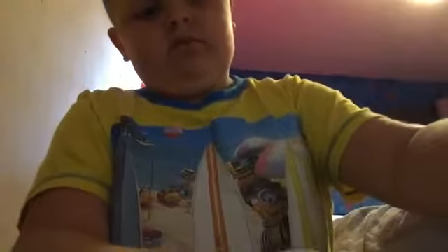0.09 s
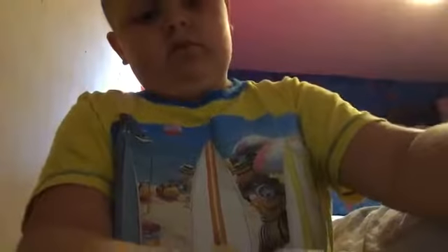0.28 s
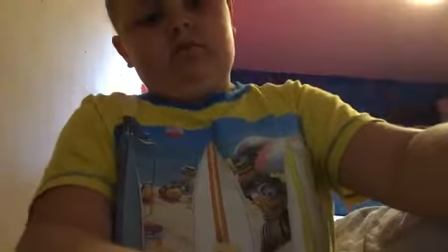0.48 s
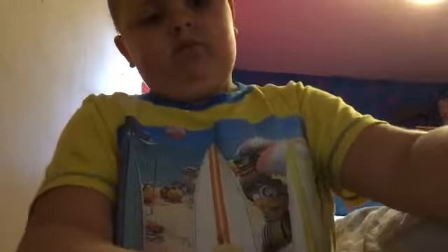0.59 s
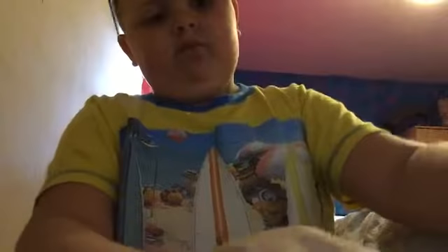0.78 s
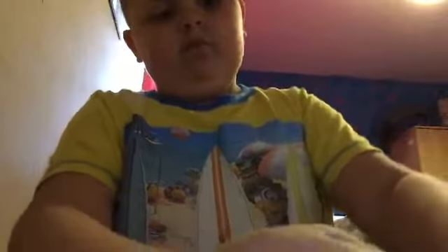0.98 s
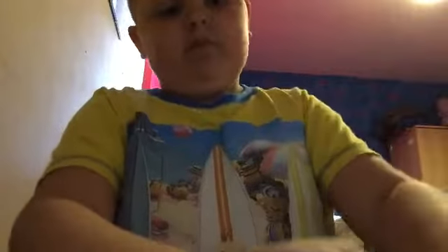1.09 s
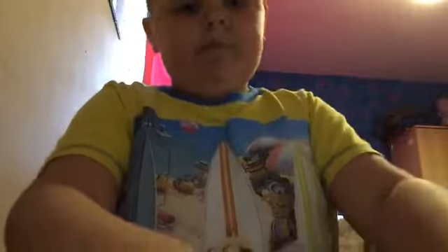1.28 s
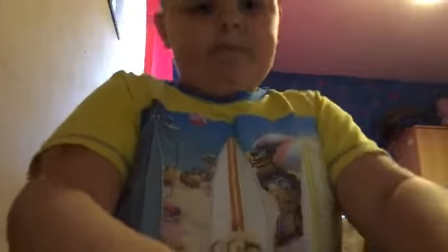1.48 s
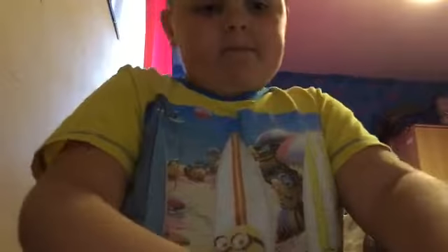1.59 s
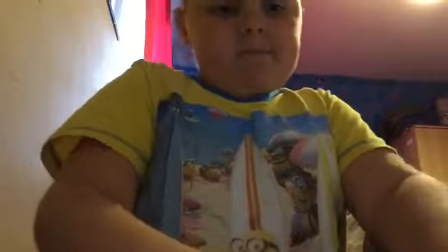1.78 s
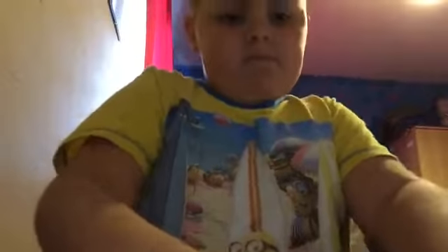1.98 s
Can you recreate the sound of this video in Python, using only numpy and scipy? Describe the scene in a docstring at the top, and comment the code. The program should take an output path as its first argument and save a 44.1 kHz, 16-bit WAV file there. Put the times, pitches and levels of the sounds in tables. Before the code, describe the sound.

Close paper crackling and rustling in uneven bursts as hands handle it, with dull knocks.

```python
"""In a bedroom, hands crumple, flex and pull a sheet of paper close to a small microphone.
Creases snap and fibres crackle in a dense rustle. Reflections from a table colour the paper's sound
with broad peaks, which shift as the sheet moves closer. Hands and sheet strike the table in soft,
damped thuds, over a low rumble of handling and the short reverberation of the room."""
import sys
import numpy as np
from scipy import signal
from scipy.fft import rfft, irfft
from scipy.io import wavfile

SR = 44100
rng = np.random.default_rng(int(sys.argv[2]) if len(sys.argv) > 2 else 0)


def log_audio(samples):
    """Write samples as a 16-bit WAV file to the path given in sys.argv[1]."""
    # one column per channel
    frames = np.atleast_2d(samples).T
    # limit to full scale, then quantise
    limited = np.clip(frames, -1, 1)
    pcm = np.round(limited * 32767).astype(np.int16)
    wavfile.write(sys.argv[1], SR, pcm)


N = 88200

# crease snaps: (time [s], low, middle, high and treble drive [dB], decay [ms], rise [ms])
CREASE_SNAPS = [(0.1009, -51, -42, -52.5, -53, 2.5, 1.5), (0.11, -29, -40.5, -64, -56, 4, 0.6),
                (0.173, -53, -42, -61, -75.9, 0.69, 0.77), (0.1815, -40.5, -44, -61, -69.9, 0.96, 0.92),
                (0.191, -60, -36, -51, -43.5, 1.4, 0.31), (0.2215, -20, -17.5, -23.5, -20.5, 2.7, 1),
                (0.2259, -25, -10.5, -30, -21, 1.3, 0.68), (0.2313, -21, -16.5, -22.5, -17.5, 2.5, 0.18),
                (0.2358, -30, -25, -31, -24, 0.54, 0.31), (0.2388, -31, -22, -33, -21, 0.44, 0.6),
                (0.2425, -33, -14, -26, -24.5, 1.8, 0.9), (0.2608, -55, -22, -31, -44, 2.5, 0.88),
                (0.2675, -33, -23, -22, -32.5, 2, 1.2), (0.272, -30, -17, -37, -44, 0.99, 0.8),
                (0.2765, -35.5, -31, -31, -45, 3, 1.4), (0.2834, -32, -21, -29, -23, 2.7, 0.36),
                (0.2898, -23.5, -22, -31, -30, 2.2, 0.64), (0.2992, -28.5, -27.5, -25.5, -49, 1.9, 0.51),
                (0.365, -38, -39, -49, -64, 2, 1.0), (0.3743, -24.5, -26, -44, -51, 1.26, 0.81),
                (0.4593, -44.5, -48.5, -65, -60, 1.5, 0.33), (0.4809, -49.5, -46, -57, -52.5, 2.8, 0.78),
                (0.4979, -57, -37.5, -47, -58, 1.3, 0.6), (0.5098, -57, -36, -40.5, -49, 1.4, 1.0),
                (0.543, -48.5, -45, -51, -66.4, 3.1, 0.55), (0.5887, -39.5, -36.5, -41, -50.5, 1.8, 0.82),
                (0.604, -45, -35.5, -47, -53, 1.1, 0.58), (0.784, -45, -38, -36, -55, 1.8, 2.1),
                (0.801, -36, -28.5, -30, -38.5, 1.5, 1.25), (0.8145, -55, -42, -36.5, -51, 2.8, 0.74),
                (0.826, -57, -61, -38, -51, 1.6, 0.85), (1.056, -36.5, -64, -74, -75, 2.8, 2.05),
                (1.142, -26.5, -35, -46.5, -54, 3.7, 0.5), (1.3864, -46.5, -63, -41, -65, 0.28, 0.48),
                (1.4254, -38, -56, -56, -72, 1.7, 0.36), (1.4638, -30, -46, -63, -55, 2.5, 0.49),
                (1.474, -33, -28, -38.5, -33, 0.7, 0.93), (1.491, -26.5, -31, -52, -44, 2.14, 0.25),
                (1.525, -34.5, -41, -47, -50, 4.1, 1.6), (1.571, -36, -40, -53, -55, 3.3, 0.44),
                (1.5943, -28, -34, -35, -42, 1.1, 0.56), (1.627, -23.5, -27, -23.5, -32, 0.44, 0.12),
                (1.849, -57, -56, -50, -38, 0.99, 0.64), (1.87, -46, -44, -45, -47, 2.5, 0.31),
                (1.881, -31.5, -50, -39, -37.5, 1.4, 1.3), (1.9079, -34, -43, -36, -46, 1, 1.2),
                (1.921, -45, -36.5, -42, -47, 4.1, 1.6), (1.9395, -36, -45, -50, -42.5, 3.7, 0.66),
                (1.9629, -34, -44, -40, -40, 1.1, 0.44)]
# rustle envelopes: (time [s], low, middle, high and treble drive [dB])
RUSTLE_LEVELS = [(0, -56, -55.5, -58, -82), (0.085, -59.5, -63, -82, -83), (0.105, -82, -56, -60, -64),
                 (0.14, -80, -56.5, -65, -76), (0.188, -84, -59, -58.2, -65), (0.215, -66, -46, -41.5, -51),
                 (0.255, -52, -55, -30.5, -29.5), (0.31, -48.5, -52, -38, -41.5),
                 (0.335, -91, -58, -67, -58), (0.36, -42, -40.5, -41, -50), (0.42, -55, -52, -49.5, -58),
                 (0.445, -70, -60.5, -74, -78), (0.5, -55.5, -52.5, -47.5, -61),
                 (0.565, -66.5, -59, -61.5, -76), (0.6, -69, -51, -47.5, -57), (0.65, -53, -56.5, -67, -85),
                 (0.72, -54, -51.5, -51, -64), (0.78, -57.5, -48, -46, -50), (0.85, -51, -42.5, -41.5, -52),
                 (0.875, -55, -64, -63, -70.5), (0.96, -58.5, -60, -61, -70.5),
                 (1.0, -59.5, -57, -54.5, -61.5), (1.1, -58, -56, -54.5, -58.5),
                 (1.13, -48.5, -44, -41, -44.5), (1.2, -53.5, -52, -48.5, -53),
                 (1.24, -63, -59, -54, -58.5), (1.27, -58.5, -59.5, -67, -78),
                 (1.41, -62, -62.5, -67.5, -89), (1.46, -53, -54, -50, -57), (1.55, -48, -43.5, -41.5, -46),
                 (1.58, -37.5, -35, -36, -44), (1.62, -41.5, -35.5, -33.5, -40.5),
                 (1.66, -48.5, -40, -43, -49.5), (1.85, -41, -42, -38.5, -43),
                 (1.93, -40.5, -41.5, -37, -42.5), (1.96, -55.5, -47, -44, -48.5),
                 (2.0, -44, -47, -46, -51)]
# broad peaks from table reflections, sheet far and near: (frequency [Hz], width [Hz], lift [dB])
FAR_PEAKS = [(1610, 1100, 14.5), (2944, 690, 12), (4080, 310, 7.5), (5300, 1200, 10.5), (6170, 560, 5)]
NEAR_PEAKS = [(1663, 830, 14), (2890, 720, 13.5), (3974, 1050, 16), (5380, 1060, 8.5), (6600, 1050, 10),
              (14270, 3700, 6)]
# spectral slopes beneath those peaks: (frequency [Hz], relative level [dB])
FAR_SLOPE = [(500, 13), (900, 1), (2200, -11.5), (7000, -5.5), (9000, -11), (11000, -20), (16000, -21)]
NEAR_SLOPE = [(500, 4), (900, -8), (2300, -15.5), (8000, -6), (10000, -17.5), (14300, -22.5),
              (16000, -21.5)]
# impacts on the table: (time [s], level [dB], starting pitch [Hz], 60 dB decay time [s])
TABLE_THUDS = [(0.114, -34.5, 415, 0.044), (0.202, -38, 325, 0.032), (0.225, -17.5, 283, 0.031),
               (0.242, -22, 495, 0.053), (0.264, -20.5, 460, 0.03), (0.284, -23, 325, 0.069),
               (0.371, -35.5, 298, 0.069), (0.582, -32, 310, 0.026), (0.676, -40, 600, 0.05),
               (0.812, -37, 240, 0.091), (0.867, -35, 237, 0.035), (1.02, -36, 264, 0.085),
               (1.052, -41, 389, 0.12), (1.061, -19, 298, 0.03), (1.143, -21, 289, 0.029),
               (1.163, -29.5, 586, 0.03), (1.299, -33, 276, 0.071), (1.396, -24, 289, 0.046),
               (1.463, -15.5, 276.3, 0.044), (1.544, -31, 260, 0.046), (1.649, -11.5, 454, 0.018),
               (1.654, -12, 219, 0.027), (1.677, -17, 312, 0.041)]
# envelope of the handling rumble: (time [s], level [dB])
RUMBLE_LEVELS = [(0, -54), (.08, -53.5), (.25, -39), (.43, -57), (.75, -57.5), (.88, -48), (.96, -60),
                 (1.08, -50.5), (1.27, -56.5), (1.43, -48.5), (1.55, -36.5), (1.75, -51.5), (2, -47)]
# spectrum of the handling rumble: (frequency [Hz], relative level [dB])
RUMBLE_SPECTRUM = [(25, -21), (70, -23.5), (130, 2), (205, -0.5), (370, -5.5), (600, -15.5), (1500, -52)]

BAND_EDGES_HZ = (550, 2200, 4500, 8000, 30000)
SNAP_GRAIN_DB, SNAP_LOW_HZ = 4.5, 880
FIBRES_PER_S, FIBRE_SPREAD_DB, HISS_DB, CLUMP_DB = 900, 2.5, 4, 1.5
APPROACH_START_S, APPROACH_END_S = 0.838, 0.9
THUD_RISE_S, THUD_SAG, TABLE_LOW_HZ = 0.0012, 0.082, 106
RUMBLE_LUMP_DB = 3
ROOM_DB, ROOM_T60_S, ROOM_HZ = -12.5, 0.1, 5400
MIC_LOW_HZ, MIC_HIGH_HZ = 79, 15760


def crease_snaps():
    """Buckling: each crease builds up, breaks in a spray of small cracks and dies out, in four bands."""
    lead = 600  # samples ahead of the break
    t_ms = np.arange(-lead, 1400) / SR * 1000
    # the low band rises and decays more slowly
    rise_stretch, decay_stretch = np.c_[[2.2, 1, 1, 1]], np.c_[[1.08, 1, 1, 1]]
    drives = np.zeros((4, N + len(t_ms)))
    for time_s, *bands_db, decay_ms, rise_ms in CREASE_SNAPS:
        rise, decay = rise_ms * rise_stretch, max(decay_ms, .3) * decay_stretch
        envelope = 2 / (np.exp(-t_ms / rise) + np.exp(t_ms / decay))
        noise, grain = rng.standard_normal((2, 4, len(t_ms)))
        spray = noise * gain_of(SNAP_GRAIN_DB * grain) * envelope
        spray *= (np.linalg.norm(envelope, axis=1) / np.linalg.norm(spray, axis=1))[:, None]
        at = round(time_s * SR)
        drives[:, at:at + len(t_ms)] += gain_of(bands_db)[:, None] * spray
    # a crease is too small to radiate low frequencies
    return signal.lfilter(*signal.butter(1, SNAP_LOW_HZ, "high", fs=SR), drives[:, lead:N + lead])


def fibre_rustle():
    """Friction: fibres crack in clumps over the hiss of paper sliding on paper and skin, in four bands."""
    size_db = FIBRE_SPREAD_DB * np.minimum(rng.exponential(1, N), 5)
    impulses = gain_of(size_db) * rng.choice([-1, 1], N)
    cracks = unit_rms(impulses * (rng.random(N) < FIBRES_PER_S / SR))
    hiss = gain_of(HISS_DB) * rng.standard_normal(N)
    drive = unit_rms((cracks + hiss) * gain_of(CLUMP_DB * wander(cutoff_hz=77)))
    return np.array([drive * gain_curve(RUSTLE_LEVELS, column) for column in (1, 2, 3, 4)])


def paper_colour(drives):
    """Interference: broad peaks stand for table reflections and shift as the sheet moves closer."""
    hz = np.fft.rfftfreq(4096, 1 / SR) + 1
    near = np.interp(np.arange(N) / SR, [APPROACH_START_S, APPROACH_END_S], [0, 1])
    out = np.zeros(N)
    for share, peaks, slope in (1 - near, FAR_PEAKS, FAR_SLOPE), (near, NEAR_PEAKS, NEAR_SLOPE):
        lift_db = sum(db / (1 + ((hz - centre) / (width / 2)) ** 2) for centre, width, db in peaks)
        for drive, low, high in zip(drives, BAND_EDGES_HZ, BAND_EDGES_HZ[1:]):
            band_db = -10 * np.log10((1 + (low / hz) ** 10) * (1 + (hz / high) ** 10))
            response = minimum_phase(spectrum_db(slope, hz) + lift_db + band_db)
            out += signal.oaconvolve(drive * np.sqrt(share), response / np.linalg.norm(response))[:N]
    return out


def table_thuds():
    """Damped oscillation: each knock on the table is a low tone whose pitch sags as it dies."""
    t = np.arange(6000) / SR
    attack = 1 - np.exp(-(t / THUD_RISE_S) ** 2)
    out = np.zeros(N + len(t))
    for time_s, db, hz, t60 in TABLE_THUDS:
        phase = 2 * np.pi * hz * t * (1 - THUD_SAG * t / (t + t60))
        at = round(time_s * SR)
        out[at:at + len(t)] += gain_of(db - 60 * t / t60) * attack * np.sin(phase)
    # the table top radiates little deep bass
    return signal.sosfilt(signal.butter(4, TABLE_LOW_HZ, "high", fs=SR, output="sos"), out[:N])


def handling_rumble():
    """Friction noise: hands and sleeves moving on the table make a low, lumpy rumble."""
    tone = gain_of(spectrum_db(RUMBLE_SPECTRUM, np.fft.rfftfreq(N, 1 / SR)))
    lumpy_noise = rng.standard_normal(N) * gain_of(RUMBLE_LUMP_DB * wander(cutoff_hz=18))
    rumble = irfft(rfft(lumpy_noise) * tone, N)
    return unit_rms(rumble) * gain_curve(RUMBLE_LEVELS, column=1)


def room_tail(direct):
    """Reverberation: sparse, dulled reflections decay exponentially in the bedroom."""
    taps = np.zeros(SR // 2)
    slots = np.arange(100, len(taps) - 20, 20)
    taps[slots + rng.integers(0, 20, len(slots))] = rng.choice([-1., 1.], len(slots))
    taps = signal.lfilter(*signal.butter(1, ROOM_HZ, fs=SR), taps)
    taps *= gain_of(-60 * np.arange(len(taps)) / SR / ROOM_T60_S)
    return signal.oaconvolve(direct, taps / np.linalg.norm(taps))[:N]


def gain_of(db):
    return 10 ** (np.asarray(db) / 20)


def unit_rms(x):
    return x / np.sqrt(np.mean(x ** 2) + 1e-20)


def gain_curve(table, column):
    """Interpolation in time: a column of levels becomes a gain at every sample."""
    rows = np.array(table)
    return gain_of(np.interp(np.arange(N) / SR, rows[:, 0], rows[:, column]))


def spectrum_db(points, hz):
    """Interpolation of level over log frequency."""
    points_hz, db = np.transpose(points)
    return np.interp(np.log(hz + 1), np.log(points_hz + 1), db)


def minimum_phase(db):
    """Hilbert relation: levels over the half spectrum give a causal impulse response."""
    log_gain = np.log(gain_of(np.maximum(np.r_[db, db[-2:0:-1]], -100)))
    response = np.exp(np.conj(signal.hilbert(log_gain)))
    return np.fft.ifft(response).real[:len(db)]


def wander(cutoff_hz):
    """Random modulation: low-passed noise of unit rms."""
    return unit_rms(signal.lfilter(*signal.butter(2, cutoff_hz, fs=SR), rng.standard_normal(N)))


def scene():
    """Superposition: paper and thuds, their reverberation and the rumble add in one channel."""
    direct = paper_colour(crease_snaps() + fibre_rustle()) + table_thuds()
    return (direct + gain_of(ROOM_DB) * room_tail(direct) + handling_rumble())[None]


def record(dry):
    """Band limiting: the small microphone rolls off the bass, then the top treble is cut."""
    thin = signal.sosfilt(signal.butter(2, MIC_LOW_HZ, "high", fs=SR, output="sos"), dry)
    low_pass = signal.firwin(511, MIC_HIGH_HZ, window=("kaiser", 9), fs=SR)
    return signal.oaconvolve(thin, low_pass[None], "same")


dry = scene()
out = record(dry)
log_audio(out)
```